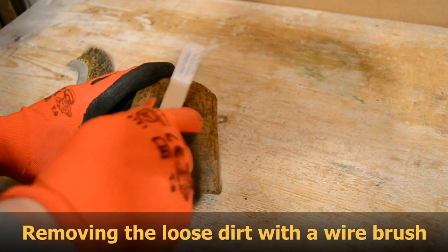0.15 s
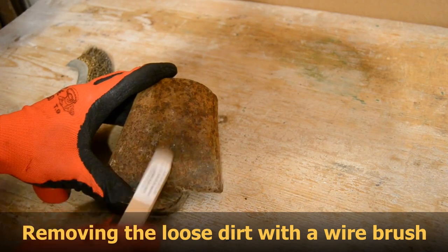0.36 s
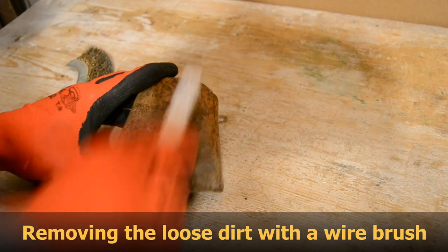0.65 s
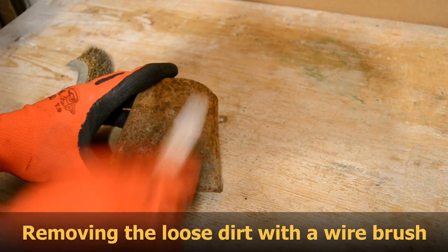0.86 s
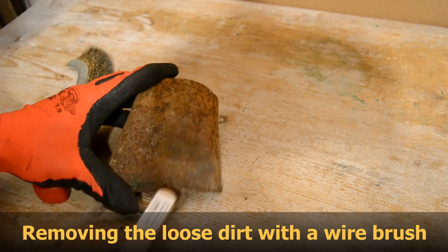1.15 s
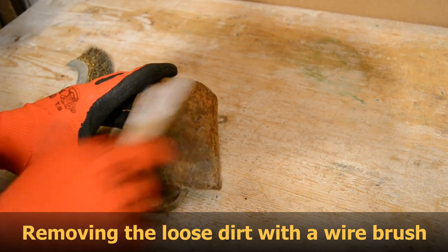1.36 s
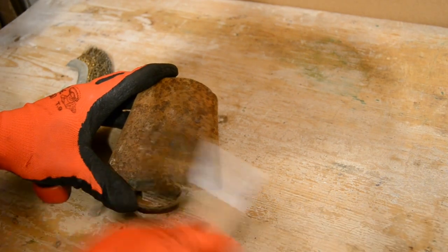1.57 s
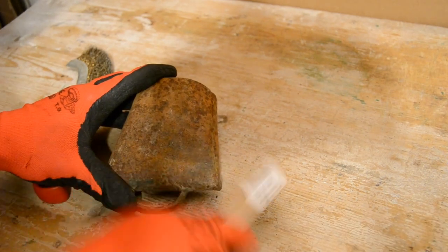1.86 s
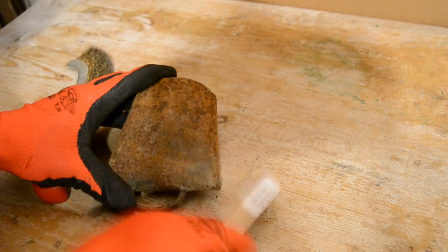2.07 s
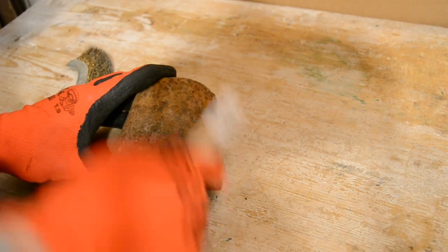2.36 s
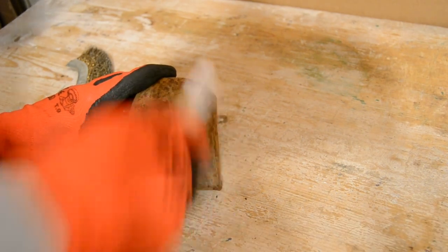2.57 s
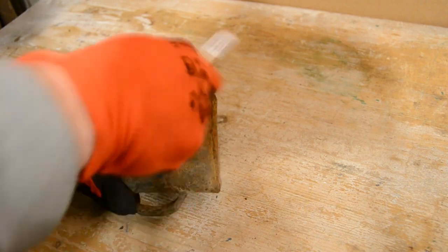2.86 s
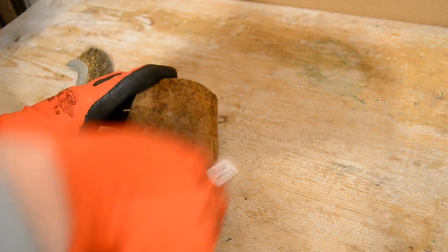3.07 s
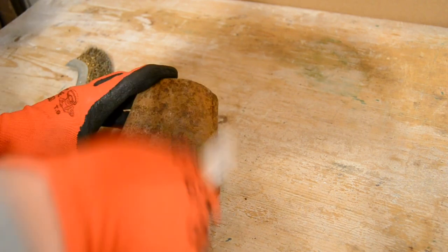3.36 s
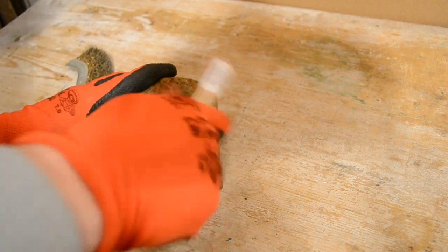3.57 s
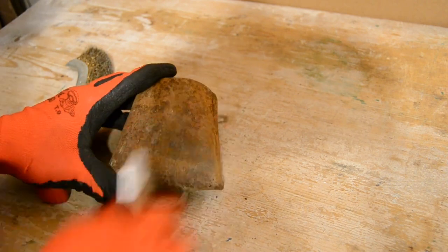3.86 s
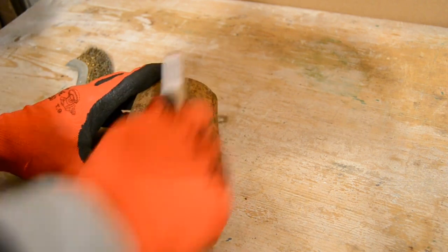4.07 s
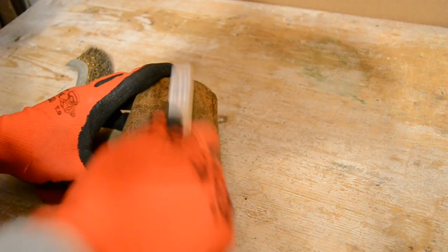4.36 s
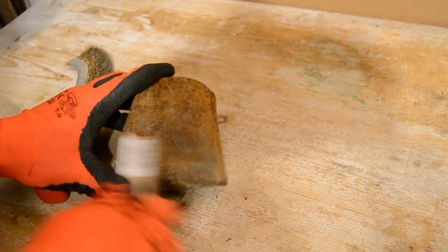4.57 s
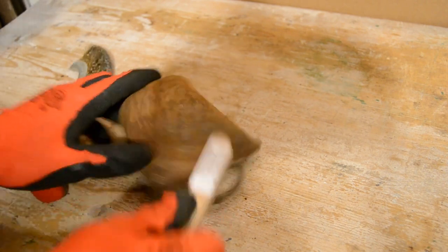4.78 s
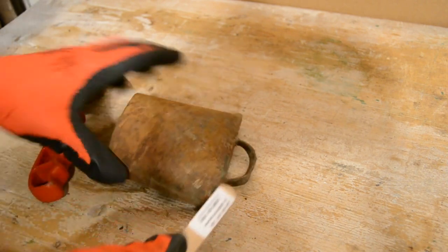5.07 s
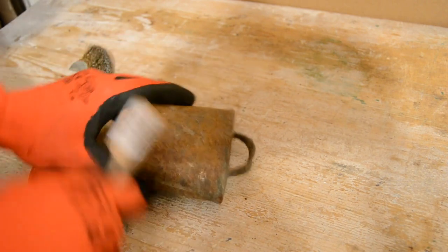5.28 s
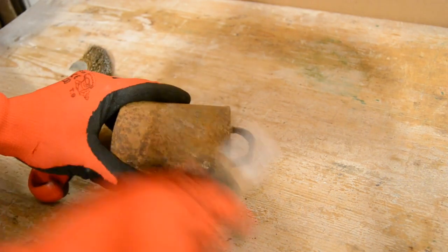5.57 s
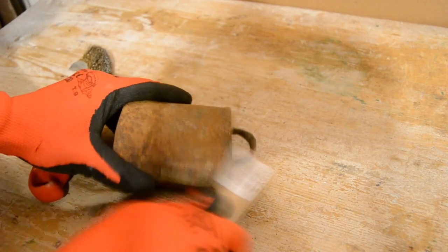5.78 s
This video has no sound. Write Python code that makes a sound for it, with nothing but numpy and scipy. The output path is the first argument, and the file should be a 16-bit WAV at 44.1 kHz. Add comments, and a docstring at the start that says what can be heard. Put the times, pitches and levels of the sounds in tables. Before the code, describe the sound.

Irregular quick scrubs of stiff wire bristles on rusted metal, harsh and gritty, each starting with a sharp metallic hit and a wooden bump. Light clinks and glove rustles fill the gaps. After a long scrape, the bell is rolled over, knocking hollowly on the bench and ringing faintly, before crisp scrubbing continues. Dry small room, near-mono close pickup, very faint steady room tone.

```python
"""In a small workshop, a wire brush scrubs a rusty cowbell that a gloved hand holds down on a wooden workbench.
Each landing excites a clash of wires, a clack of the bell and a thud of the bench: short bursts through resonators.
Along a stroke, random stick-slip clicks rasp the rust, ring the damped bell and shake the bench.
Near the end the bell is tipped onto its side and the scrubbing goes on; faint room tone lies under everything."""
import sys
import numpy as np
from scipy import signal
from scipy.fft import rfft, irfft
from scipy.io import wavfile

SR = 44100
rng = np.random.default_rng(int(sys.argv[2]) if len(sys.argv) > 2 else 0)


def master_out(mix):
    """Clip the mix to full scale and print it as 16-bit PCM to the path in sys.argv[1]."""
    frames = np.transpose(np.atleast_2d(mix))
    ceiling = np.clip(frames, -1, 1)
    pcm = np.round(ceiling * 32767).astype(np.int16)
    wavfile.write(sys.argv[1], SR, pcm)


N = 261513
SIZE = 16384  # samples in one event
FREQS = np.arange(SIZE // 2 + 1) * SR / SIZE  # Hz
AGE = np.arange(SIZE) / SR  # s since the event began
TIME = np.arange(N) / SR  # s

# resonances of the held bell: pitch_hz, width_hz, over_broad_rasp_db (nominal)
BELL_MODES = [(2410, 30, 11), (2830, 32, 11), (3200, 22, 16), (3325, 30, 14), (3470, 55, 14),
              (4230, 40, 10), (4370, 75, 14), (4610, 40, 13), (5350, 110, 12), (6080, 80, 7), (6400, 40, 7),
              (6730, 50, 14), (7070, 44, 13), (7430, 55, 13), (8220, 55, 9), (9170, 110, 12),
              (9740, 60, 11), (9940, 45, 11), (10100, 35, 8)]
# resonances of the bench: pitch_hz, width_hz, over_broad_response_db
BENCH_MODES = [(128, 16, 8), (149, 19, 15.5), (222, 24, 11), (320, 42, 10), (395, 40, 4), (525, 35, 6),
               (583, 25, 6)]
# broad response of the bench wood: pitch_hz, gain_db
WOOD_COLOUR = [(25, -35), (82, -33), (118, -6), (152, 0), (190, -13), (218, -4), (340, -3), (410, -2),
               (600, -9), (1200, -28), (4000, -60)]
# the hand lets go while the bell rolls over: from_s, to_s
LOOSE_TIME = (4.7, 5.35)


def undb(db):
    """Logarithmic level: decibels become an amplitude ratio."""
    return 10 ** (np.asarray(db) / 20)


def level(x, db=0, size=None):
    """Root-mean-square level: divide by the rms of the first `size` samples, then apply db."""
    return x * undb(db) / np.sqrt(np.mean(x[:size] ** 2))


def add(out, start_s, x):
    """Superposition: sum x into out from start_s, clipped at the end."""
    i = max(int(start_s * SR), 0)
    out[i:i + len(x)] += x[:len(out) - i]


def body(x, colour, modes=(), scatter_db=0):
    """Source-filter principle: x excites a broad colour with resonances, scattered as by the place of touch."""
    hz, db = np.transpose(colour)
    power = np.ones(len(FREQS))
    for pitch_hz, width_hz, peak_db in modes:
        strength = undb(peak_db + scatter_db * rng.standard_normal()) ** 2
        power += strength / (1 + (2 * (FREQS - pitch_hz) / width_hz) ** 2)
    broad = undb(np.interp(np.log(FREQS + 1), np.log(hz), db))
    gain = broad * np.sqrt(power)
    # minimum phase: every resonance rings after the touch
    cepstrum = irfft(np.log(gain))[:SIZE // 2]
    cepstrum[1:] *= 2
    response = irfft(np.exp(rfft(cepstrum, SIZE)))[:SIZE // 2]
    return signal.fftconvolve(x, response)[:len(x)]


def snags(size, per_s, spread_db):
    """Stick-slip friction: catches and slips form a random train of unequal clicks of either sign."""
    happens = rng.random(size) < per_s / SR
    sign = rng.choice([-1, 1], size)
    strength = undb(spread_db * np.minimum(rng.standard_normal(size), 2))
    return happens * sign * strength


def flutter(size, rate):
    """Random modulation: straight lines join `rate` random points a second, of unit spread."""
    return np.interp(np.arange(size) / SR * rate, np.arange(size), rng.standard_normal(size))


def burst(rise_s, fall_s):
    """Impact envelope: contacts arriving almost together rise fast and decay exponentially."""
    return (1 - np.exp(-(AGE / rise_s) ** 2)) * np.exp(-AGE / fall_s)


def room_tone():
    """Stationary noise: white noise shaped by a broad colour stays faint and steady."""
    # colour of the quiet room: pitch_hz, gain_db
    tone_colour = [(25, -23), (60, -59), (100, 5), (135, 11), (190, -11.5), (300, 1.5), (500, -4),
                   (780, -1.5), (1200, -7.5), (2200, -7.5), (3500, -12.5), (6500, -20), (10200, -22),
                   (11700, -57)]
    return level(body(rng.standard_normal(N), tone_colour), -62.5)


def swishes():
    """Friction: glove, brush and loose dirt rub or catch in dense crumb clicks under short and long swells."""
    # dry rubs and catches: centre_s, half_length_s (standard deviation of the swell), level_db
    rubs = [(0.0, 0.059, -49.5), (0.145, 0.12, -61.5), (1.186, 0.0063, -40.5), (1.523, 0.0085, -35.5),
            (2.495, 0.014, -58.5), (3.216, 0.0018, -60), (3.639, 0.011, -47), (3.908, 0.014, -36.5),
            (4.295, 0.011, -33), (4.723, 0.12, -51), (5.27, 0.029, -53), (5.44, 0.051, -55.5)]
    # broad colour of the crumb clicks: pitch_hz, gain_db
    dust_colour = [(200, -11.5), (700, -2), (1500, -0.5), (2400, 1), (3600, -2.5), (7000, -8.5),
                   (10500, -9.5), (12000, -48)]
    swell = sum(undb(db) * np.exp(-((TIME - centre_s) / half_s) ** 2 / 2) for centre_s, half_s, db in rubs)
    crumbs = snags(N, per_s=4000, spread_db=4) * undb(2 * flutter(N, rate=70))
    return swell * level(body(crumbs, dust_colour))


def bumps():
    """Impulse response: the hand leaning on the bench gives a smooth push that rings its modes."""
    # pushes of the hand: start_s, level_db
    pushes = [(0.057, -47.5), (0.399, -58), (1.17, -48), (2.716, -56), (3.404, -40.5), (4.846, -43),
              (4.945, -36), (5.281, -55)]
    out = np.zeros(N)
    for start_s, db in pushes:
        add(out, start_s, level(body(burst(0.0013, 0.0051), WOOD_COLOUR, BENCH_MODES), db, size=900))
    return out


def bell_at(time_s):
    """Boundary conditions set the modes: worked on its edge, let go, lying on its side or simply held."""
    # the brush works along the bell's edge: from_s, to_s
    edge_time = (2.5, 3.55)
    # resonances driven harder at the edge: pitch_hz, width_hz, over_broad_rasp_db (nominal)
    edge_modes = [(1550, 80, 14), (2410, 30, 18), (3200, 30, 14), (4340, 90, 17)]
    # resonances that ring on while not held: pitch_hz, width_hz, over_broad_rasp_db (nominal)
    loose_modes = [(1480, 9.1, 34), (3177, 12, 24), (3210, 15, 25), (4260, 26, 25), (4510, 24, 27),
                   (5430, 18, 10), (5780, 14, 10), (6270, 18, 17)]
    # broad resonances of the flat face lying upward: pitch_hz, width_hz, over_broad_rasp_db (nominal)
    face_modes = [(1540, 280, 15.5), (2630, 450, 12), (4690, 190, 19), (6430, 190, 14.5)]
    if edge_time[0] < time_s < edge_time[1]:
        return BELL_MODES + edge_modes
    if LOOSE_TIME[0] < time_s < LOOSE_TIME[1]:
        return BELL_MODES + loose_modes
    return BELL_MODES + face_modes if time_s > LOOSE_TIME[1] else BELL_MODES


def support_at(time_s):
    """Coupled resonators: from the toppling on, the bell's hollow side adds modes to the bench."""
    # bell pressed flat on the bench: pitch_hz, width_hz, over_broad_response_db
    side_modes = [(220, 8, 20.5), (307, 24, 25), (446, 20, 1), (580, 120, 17)]
    return BENCH_MODES + side_modes if time_s > LOOSE_TIME[0] else BENCH_MODES


def clack(db, pitch_hz, ring_db=9):
    """Damped impact: a blunt burst of contacts drives one low mode of the bell; db is a nominal peak."""
    # colour of the blunt knock: pitch_hz, gain_db
    clack_colour = [(250, -22), (550, -8), (650, -13), (750, 1), (890, -1), (1020, -7), (1250, -9),
                    (1550, -8), (2000, -17), (4000, -30), (11000, -50)]
    blow = snags(SIZE, per_s=5300, spread_db=1.5) * burst(0.0016, 0.0042)
    return level(body(blow, clack_colour, [(pitch_hz, 70, ring_db)]), db - 9.0, size=450)


def thud(db, modes, rattle=.07):
    """Force transmission: a push through the bell excites the bench, with a short noisy rattle."""
    push = np.exp(-AGE / 0.0011)
    push = push + rattle * burst(0.0022, 0.011) * rng.standard_normal(SIZE)
    return level(body(push, WOOD_COLOUR, modes), db - 0.9, size=700)


def contacts(crest_db=16.0):
    """Impact excitation: a shower of wire hits clashes on the bell, which clacks and thuds on the bench."""
    # brush meets bell: start_s, clash_peak_db, clack_db, thud_db (nominal), clack_pitch_hz, strongest_ring_hz
    landings = [(0.2415, -15.5, -23.5, -35.5, 783, 3220), (0.6559, -10.5, -11, -30.5, 763, 4260),
                (1.0327, -13.5, -23.5, -36.5, 790, 5850), (1.3285, -38.5, -50, -74, 710, 4470),
                (1.4168, -16.5, -24, -41, 676, 6100), (1.7878, -16.5, -42, -42.5, 1040, 3480),
                (1.9015, -34.5, -50, -70, 750, 5470), (2.0321, -18, -29, -40.5, 870, 4800),
                (2.2434, -19, -33.5, -39.5, 705, 4640), (2.5692, -8.5, -20, -35.5, 713, 3120),
                (2.9433, -7.5, -19.5, -34, 760, 4320), (3.2861, -12, -19.5, -35.5, 693, 4260),
                (3.6247, -52, -43, -80, 850, 2800), (3.6649, -25, -40.5, -40.5, 674, 5560),
                (4.0965, -10, -29, -40, 825, 5470), (4.4709, -18.5, -16, -29, 790, 3200),
                (4.968, -29, -52, -52, 830, 4470), (5.3681, -37.5, -45, -57, 1080, 5360),
                (5.4405, -8, -19, -26, 903, 4660), (5.7274, -13, -19.5, -26.5, 860, 4370)]
    # broad colour of the wire clash: pitch_hz, gain_db
    clash_colour = [(900, -13), (2000, -9.5), (3200, 1), (3800, -2), (4500, 0.5), (6000, 5.5), (7000, -5.5),
                    (7800, 0), (10400, -3), (11100, -11), (11900, -33)]
    out = np.zeros(N)
    for start_s, peak_db, clack_db, thud_db, clack_hz, ring_hz in landings:
        shower = snags(SIZE, per_s=14000, spread_db=1) * burst(0.0013, 0.0057)
        modes = bell_at(start_s) + [(ring_hz, 70, 13)]
        clash = body(shower, clash_colour, modes, scatter_db=3.5)
        # the blow reaches wires, bell and bench in turn
        add(out, start_s + 0.00055, level(clash, peak_db - crest_db, size=660))
        add(out, start_s + 0.001165, clack(clack_db, clack_hz))
        add(out, start_s + 0.002, thud(thud_db, support_at(start_s)))
    return out


def effort(length_s, swell_db):
    """Friction follows speed and weight: courses in dB for rasp, grinding and rumble along one stroke."""
    fastest, slowing_db = 0.68, 12  # share of the stroke at full speed; rasp lost from there to its end
    along = np.minimum(AGE / length_s, 1)
    # a negative swell starts above the full-speed level
    rising_db = -swell_db * (1 - along / fastest) ** 2
    slowing = -slowing_db * ((along - fastest) / (1 - fastest)) ** 2
    speed_db = np.where(along < fastest, rising_db, slowing)
    lifted_s = np.maximum(AGE - length_s, 0)  # time since the brush began to leave the bell
    landing_db = 9 * np.exp(-AGE / 0.02)  # extra shaking while the landing dies away
    # the arm's weight eases off (dB/s of age); the release is steeper (dB/s of lift)
    rasp_db = speed_db - 432 * lifted_s
    grind_db = -103 * AGE - 265 * lifted_s
    rumble_db = landing_db - 91 * AGE - 122 * lifted_s
    return rasp_db, grind_db, rumble_db


def wires(count=26, width_hz=28, ring_db=9):
    """Independent resonators: the tufts bearing on the bell each sing at a random pitch."""
    return [(pitch_hz, width_hz, ring_db) for pitch_hz in rng.uniform(4000, 10500, count)]


def travel(tips, modes, bright_db, count=7):
    """Moving excitation point: crossfaded places on the bell wake other mode strengths and other wires."""
    # broad colour of the wire tips on rust: pitch_hz, gain_db
    rasp_colour = [(900, -7.5), (1900, -9), (3000, -4), (4000, -1.5), (5000, -2), (7400, -0.5), (7900, -5),
                   (8500, 2.5), (10000, -1.5), (10600, -1.5), (11400, -10), (11900, -25)]
    # the extra brightness grows from 7 to 11 kHz
    colour = [(hz, db + np.interp(hz, [7000, 11000], [0, bright_db])) for hz, db in rasp_colour]
    place = AGE / AGE[-1] * (count - 1)
    out = np.zeros(SIZE)
    for k in range(count):
        nearness = np.sqrt(np.clip(1 - abs(place - k), 0, 1))  # equal-power crossfade
        out += body(tips * nearness, colour, modes + wires(), scatter_db=5.0)
    return out


def scrubbing(most_per_s=8000, lightest=.2, firm_db=-31.0):
    """Stick-slip excitation: tips rasp, the pressed brush grinds lower down, and judder shakes the bench."""
    # rubs of the brush: start_s, length_s, bite_s (time to take hold), swell_db, full_speed_rasp_db, grind_db,
    # rumble_db (nominal, before the stroke's course), strongest_ring_hz, extra_tip_brightness_db
    strokes = [(0.258, 0.19, 0.0053, 8, -31, -37, -41, 9730, 1),
               (0.670, 0.16, 0.0025, 7, -29.5, -37, -39.5, 4700, -1.5),
               (1.045, 0.17, 0.015, 9.5, -28.5, -34, -36, 6900, -2.5),
               (1.421, 0.097, 0.005, -2, -34.5, -37, -43, 3470, -3),
               (1.503, 0.13, 0.032, 12, -31, -43, -47, 7400, -2.5),
               (1.793, 0.077, 0.008, 10, -31, -45.5, -43, 3120, -0.5),
               (2.042, 0.055, 0.0044, 6, -34, -44.5, -43.5, 4450, 0),
               (2.253, 0.066, 0.004, -8, -38.5, -45, -43.5, 4470, -1),
               (2.578, 0.150, 0.0029, 1.5, -34, -36.5, -36, 9670, -1),
               (2.957, 0.154, 0.0024, -3.5, -34.5, -36.5, -40.5, 4370, -2.5),
               (3.303, 0.16, 0.015, 3, -34, -35, -39, 3120, 0.5),
               (3.688, 0.22, 0.12, 8.5, -29, -29.5, -35.5, 5440, -4.5),
               (4.110, 0.18, 0.0085, 19, -27, -33, -41, 3540, -4.5),
               (4.485, 0.14, 0.0043, 8, -31.5, -35.5, -40, 6970, -3.5),
               (4.687, 0.075, 0.065, 21, -37, -38.5, -41, 3340, -4),
               (4.805, 0.018, 0.0045, -4, -56, -48, -58, 4550, -7),
               (4.862, 0.26, 0.09, -27.5, -58.5, -43.5, -42, 4510, -14),
               (5.452, 0.11, 0.0024, 5, -31, -39, -37, 6550, 7.5),
               (5.742, 0.094, 0.0033, 6.5, -30, -42, -39, 7750, 6.5)]
    # broad colour of the grinding: pitch_hz, gain_db
    grind_colour = [(300, -22), (540, -6), (650, -11), (740, 2), (890, 2), (1100, -6), (1300, -8),
                    (1600, -7), (2000, -16), (3200, -26)]
    out = np.zeros(N)
    for start_s, length_s, bite_s, swell_db, rasp_db, grind_db, rumble_db, ring_hz, bright_db in strokes:
        speed, weight, shake = effort(length_s, swell_db)
        touch = np.minimum(AGE / bite_s, 1)
        grip = flutter(SIZE, rate=110)  # patches of rust catch the whole brush
        # a light touch leaves few wires on the metal: 1.1 dB fewer per dB below firm
        firmness = np.clip(undb(1.1 * (rasp_db - firm_db)), 0, 1)
        pressure = firmness * np.clip(undb(speed), lightest, 1)
        clicks = snags(SIZE, per_s=most_per_s * pressure, spread_db=4.6)
        # the root keeps the mean power while the grain thins
        tips = clicks / np.sqrt(pressure) * undb(1.3 * grip)
        modes = bell_at(start_s) + [(ring_hz, 49, 15.5)]
        rasp = level(travel(tips, modes, bright_db), rasp_db + speed)
        scrapes = snags(SIZE, per_s=2000, spread_db=1.0) * undb(0.8 * grip)
        grind = level(body(scrapes, grind_colour), grind_db + weight)
        # a negative spread limits the weak clicks instead of the strong ones
        judder = snags(SIZE, per_s=1200, spread_db=-2.5)
        rumble = level(body(judder, WOOD_COLOUR, BENCH_MODES), rumble_db + shake)
        add(out, start_s, touch * (rasp + grind + rumble))
    return out


def clinks():
    """Light impact: the bell rocks, or the brush bounces or catches on it; noise rings its iron by a clack."""
    # light knocks of the bell: start_s, ring_db, clack_db (nominal peak), ring_hz, clack_pitch_hz
    light_knocks = [(1.178, -33, -60, 3010, 760), (1.242, -50, -41, 4140, 694),
                    (1.650, -51, -44, 3130, 776), (1.711, -63, -41, 3200, 796),
                    (1.86, -61, -34.5, 4400, 825), (1.988, -68, -44, 2800, 700),
                    (2.087, -69, -26.5, 4500, 976), (2.126, -67, -48, 3420, 890),
                    (2.203, -65, -50, 3200, 790), (2.229, -52, -44, 3210, 726),
                    (2.298, -53, -36.5, 4440, 870), (2.447, -55, -40, 3220, 680),
                    (2.796, -67, -48, 3260, 770), (2.820, -56.5, -38, 3200, 694),
                    (2.957, -50, -28, 4320, 880), (3.090, -67, -33.5, 4400, 870),
                    (3.295, -46, -22, 3230, 800), (3.717, -40, -53, 3190, 910),
                    (4.734, -39.5, -37, 3380, 835), (4.875, -57, -37.5, 4300, 695),
                    (5.03, -65, -75, 3250, 864), (5.24, -66, -49, 4600, 700),
                    (5.302, -58, -45.5, 4250, 724)]
    # colour of a light touch on the iron: pitch_hz, gain_db
    clink_colour = [(1000, -26), (2400, -15), (2900, -1), (3400, 0), (3900, -12), (4500, -10), (5500, -21),
                    (10000, -28), (11900, -50)]
    out = np.zeros(N)
    for start_s, ring_db, clack_db, ring_hz, clack_hz in light_knocks:
        chatter = rng.standard_normal(SIZE) * burst(0.00056, 0.0093)
        ring = body(chatter, clink_colour, BELL_MODES + [(ring_hz, 45, 20)])
        add(out, start_s, level(ring, ring_db, size=660))
        add(out, start_s, clack(clack_db, clack_hz, ring_db=18.5))
    return out


def tumbling():
    """Cavity resonance: the bell rocks, topples and settles, and softened blows sound its hollow tones."""
    # knocks on the wood: start_s, level_db, brightness_hz (low-pass corner of the blow)
    knocks = [(3.398, -36, 400), (4.762, -25.5, 1810), (4.769, -30.5, 1390), (4.78, -29.5, 1450),
              (4.84, -45.5, 800), (4.87, -59, 900), (4.941, -41, 900), (4.954, -48, 350)]
    # broad colour of the knock: pitch_hz, gain_db
    knock_colour = [(30, -48), (100, -4), (200, -1), (600, 0), (1400, -5.5), (2500, -4.5), (6000, 3),
                    (11000, -44)]
    # hollow tones of the bell lying on the wood: pitch_hz, width_hz, over_broad_knock_db
    hollow_modes = [(226, 16, 14), (310, 30, 9), (458, 34, 14), (520, 34, 14), (587, 22, 14), (680, 25, 8),
                    (802, 22, 9), (1066, 30, 16), (1217, 26, 10)]
    out = np.zeros(N)
    for start_s, db, bright_hz in knocks:
        blow = np.exp(-AGE / .00006) + 0.24 * np.exp(-AGE / 0.009) * rng.standard_normal(SIZE)
        lowpass = signal.butter(2, bright_hz, fs=SR, output="sos")
        soft = signal.sosfilt(lowpass, blow)
        add(out, start_s, level(body(soft, knock_colour, hollow_modes), db, size=800))
    return out


def workshop(x, t60_s=0.12, wet_db=-15, low_hz=400, damp_hz=5000):
    """Diffuse reverberation: exponentially fading noise gives a short, dull echo with little bass."""
    tail = rng.standard_normal(SIZE) * undb(-60 * AGE / t60_s) * (AGE > .005)
    band = signal.butter(1, [low_hz, damp_hz], "bandpass", fs=SR, output="sos")
    tail = signal.sosfilt(band, tail)
    tail = tail / np.sqrt(np.sum(tail ** 2))
    return x + undb(wet_db) * signal.fftconvolve(x, tail)[:N]


def scene():
    """Superposition in the centre: every source gets the echo, and the room tone is added dry."""
    tone = room_tone()
    sources = swishes() + bumps() + contacts() + scrubbing() + clinks() + tumbling()
    mono = workshop(sources) + tone
    return np.array([mono, mono])


def record(dry):
    """Band limiting: a gentle high-pass thins the deep bass and a steep low-pass cuts the top octave."""
    highpass = signal.butter(1, 90, "highpass", fs=SR, output="sos")
    thin = signal.sosfilt(highpass, dry)
    # order 8, 0.2 dB ripple, 70 dB rejection, 11.7 kHz edge
    lowpass = signal.ellip(8, .2, 70, 11700, fs=SR, output="sos")
    return signal.sosfilt(lowpass, thin)


dry = scene()
out = record(dry)
master_out(out)
```